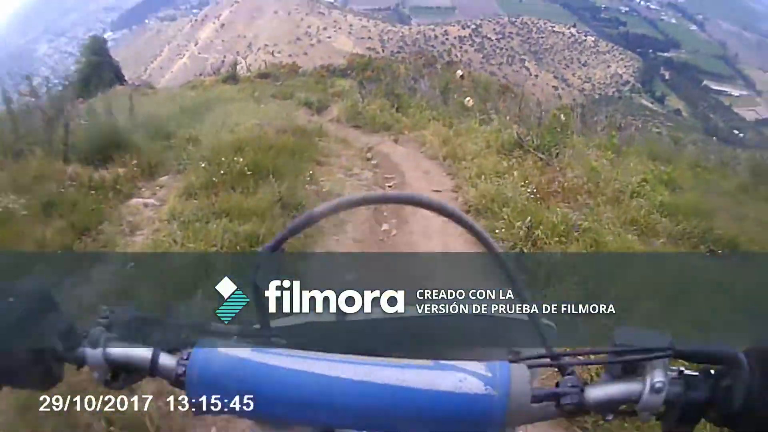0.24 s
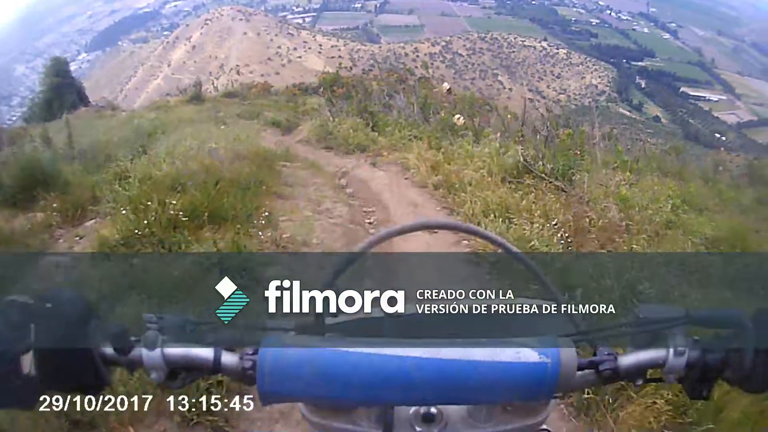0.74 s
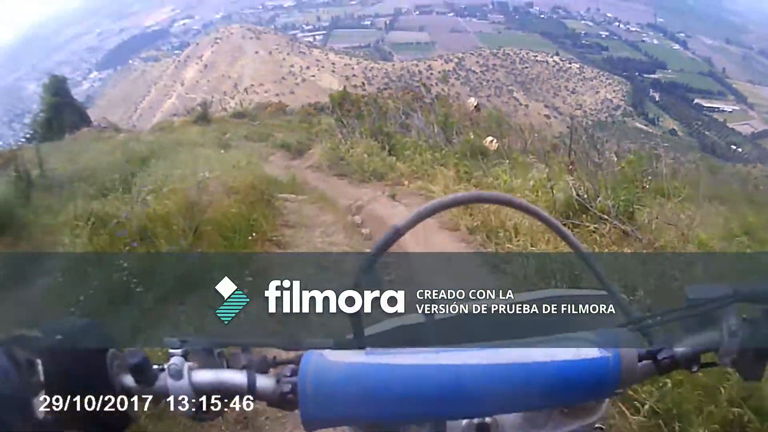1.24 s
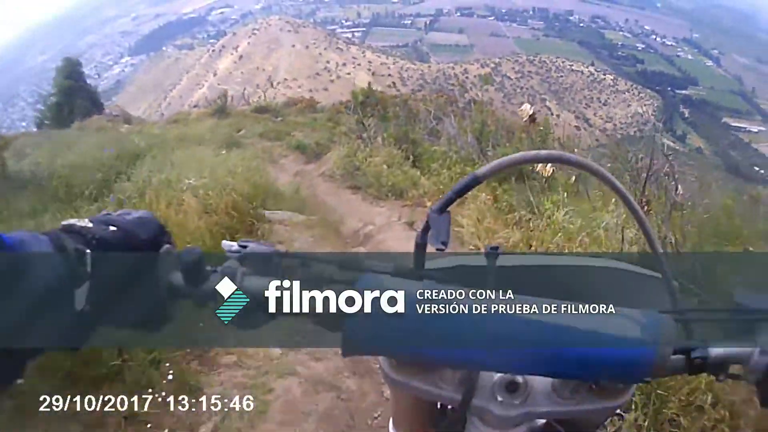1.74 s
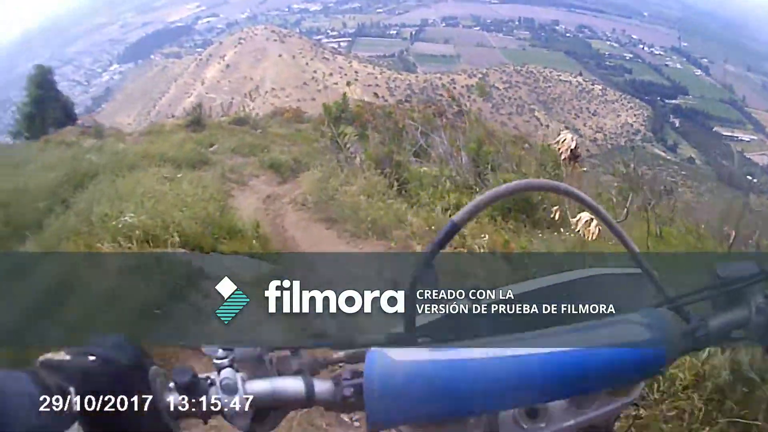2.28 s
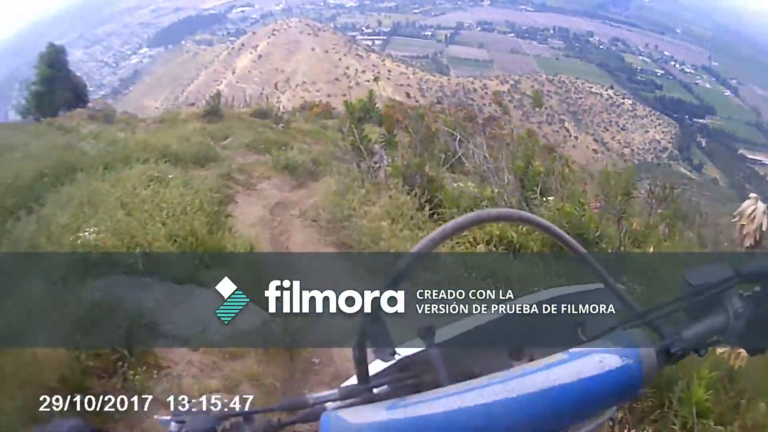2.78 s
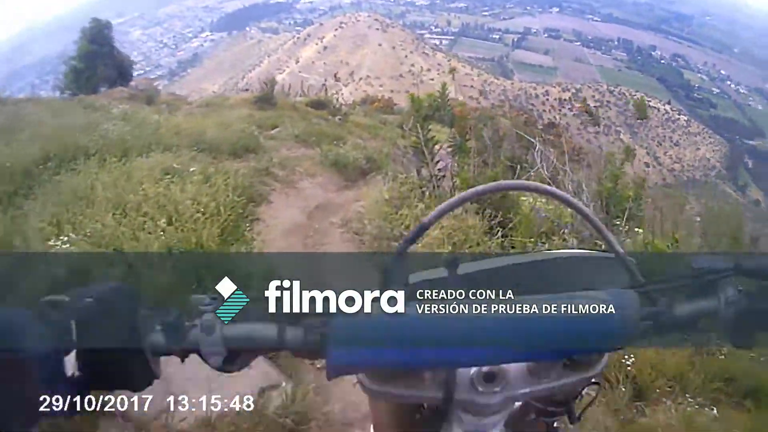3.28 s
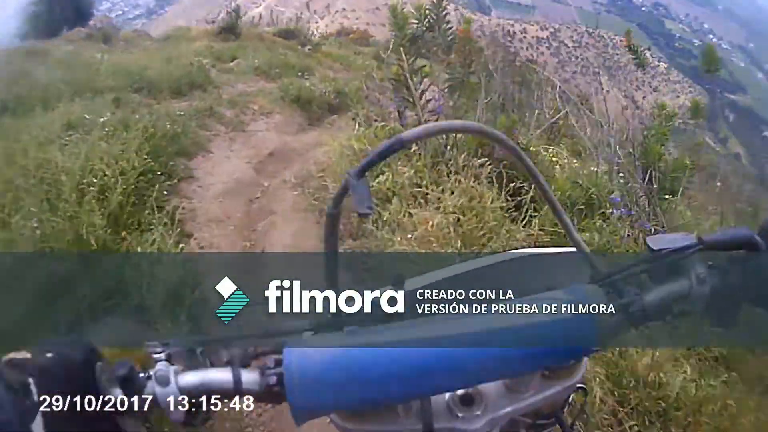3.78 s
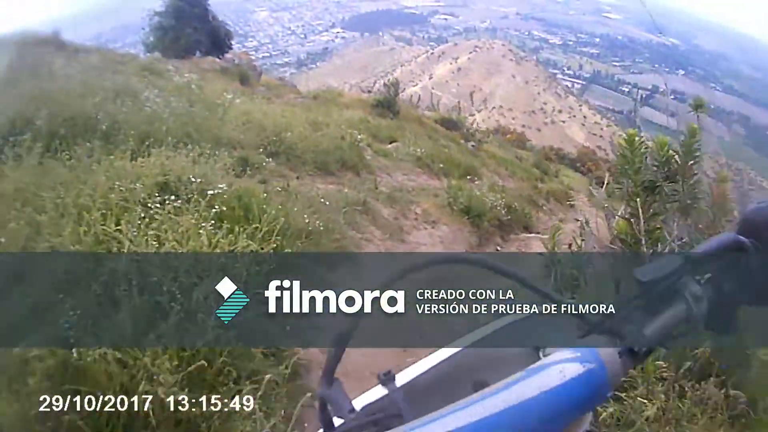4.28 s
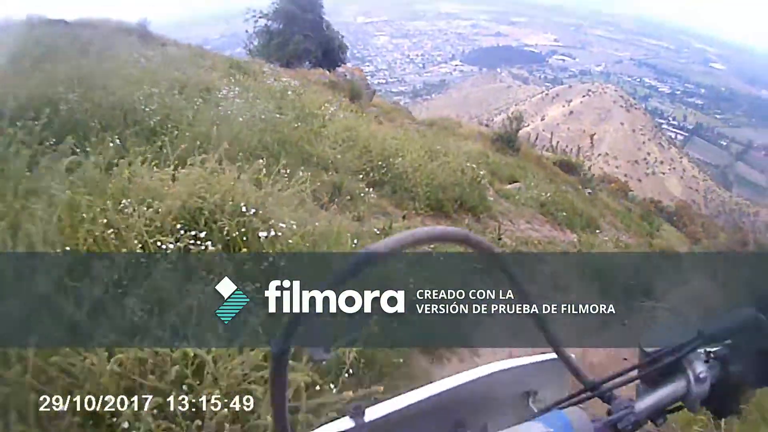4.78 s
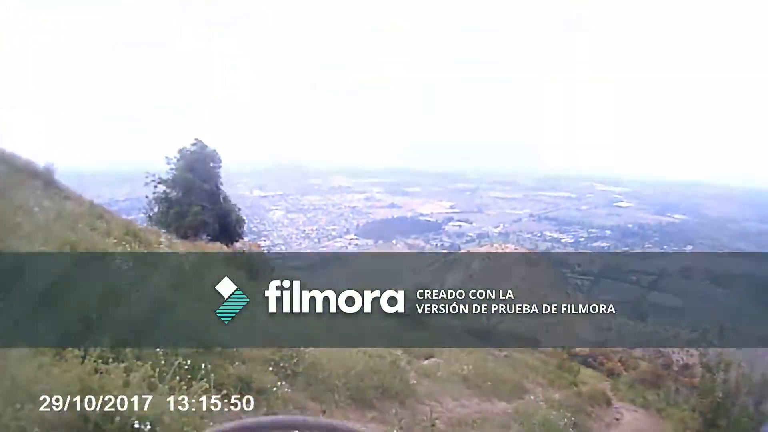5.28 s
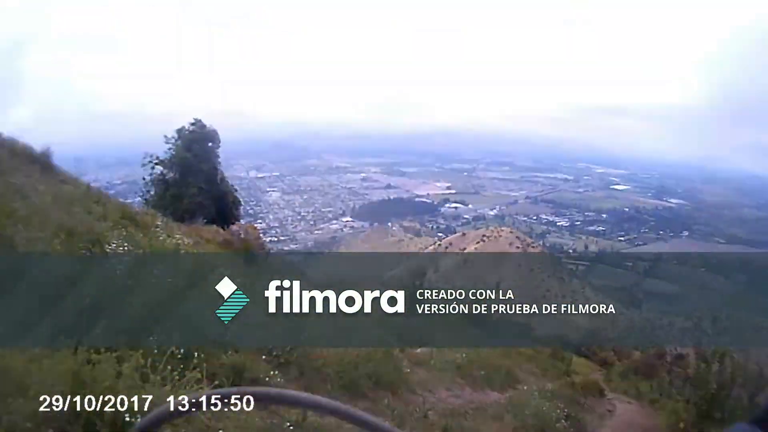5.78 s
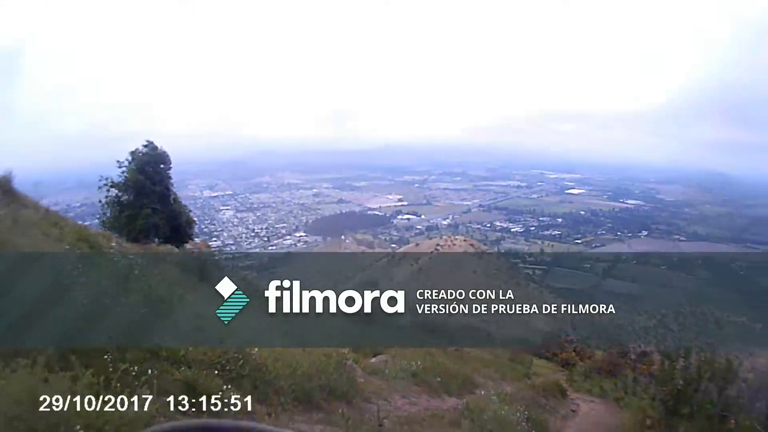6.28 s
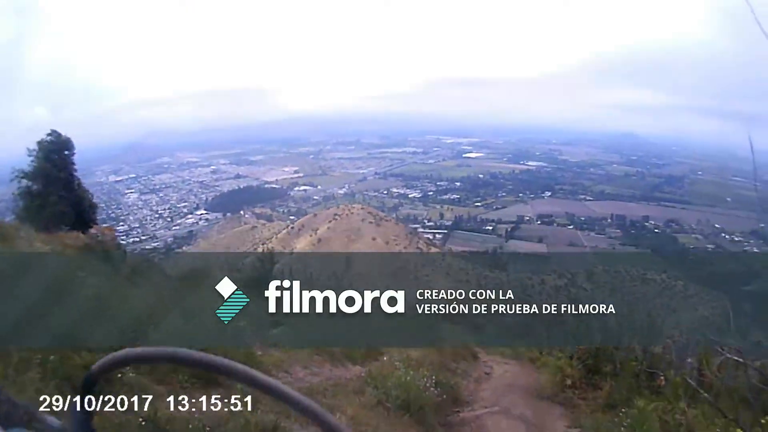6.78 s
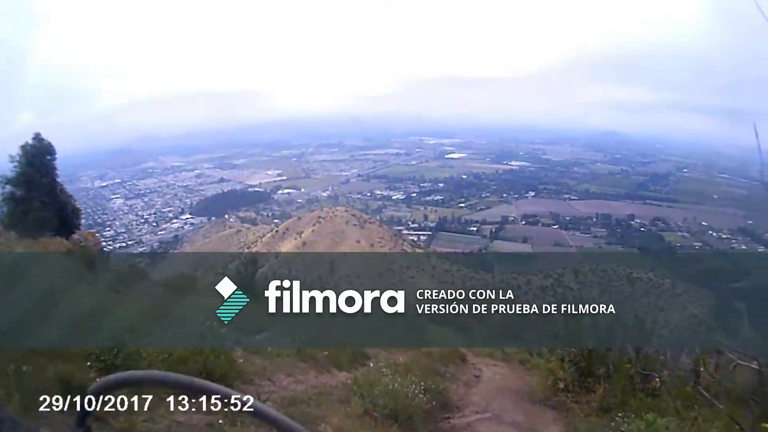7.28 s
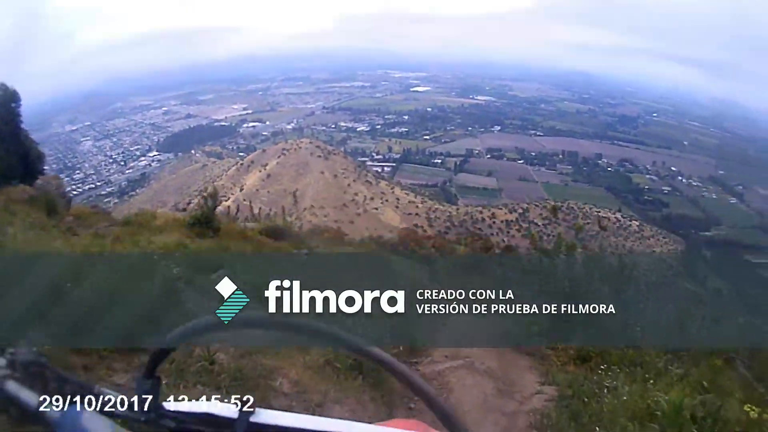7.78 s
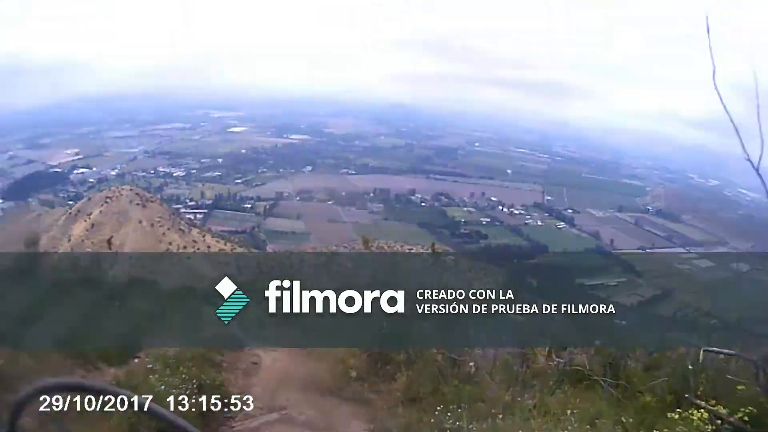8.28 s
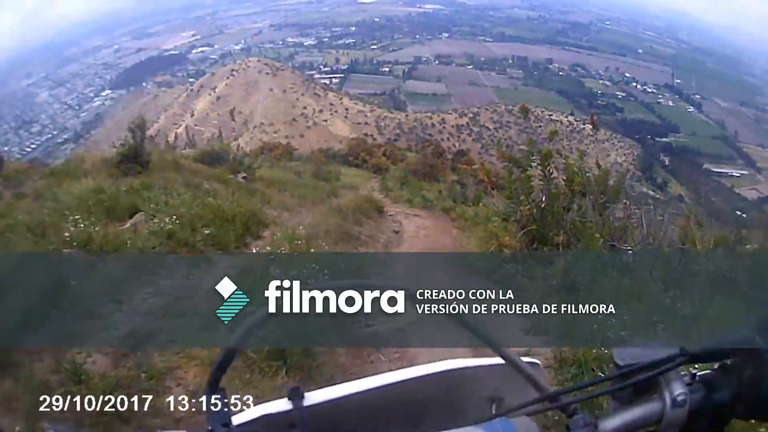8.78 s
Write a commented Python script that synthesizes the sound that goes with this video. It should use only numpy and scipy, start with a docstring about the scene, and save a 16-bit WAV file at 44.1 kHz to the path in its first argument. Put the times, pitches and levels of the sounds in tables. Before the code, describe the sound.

Throughout about nine seconds, a single-cylinder dirt bike idles down a rough outdoor trail, heard dry and close from the rider. Its soft, low exhaust putters roughly eighteen to nineteen times a second, wandering slightly and sometimes missing, while valve gear makes a grainy metallic clatter, quieter near 5 and stronger at the end. Low rumble, crunching tyres and short grass brushes vary with the ground. Light ticks at 0.6 lead to the loudest event at 0.77: a hard plastic clack with a deep thump. Smaller ticks and a lurch follow around 1.1 to 1.4, then tiny wavering brake squeaks at 1.65 to 1.8. Thumps and hollow tocks come at 2.3, another tock at 2.9. The ride calms until a heavy double-edged jolt and knock at 5.3. Later come softer swings, a faint squeak at 6.1, weak ticks near 6.5 and 8, and constant faint hiss.

```python
"""A single-cylinder dirt bike rolls down a rough trail at idle, heard by a microphone the rider wears.
From the start the exhaust putters, missing now and then, as pulses ring a pipe; filtered noise bursts
make the valve gear clatter. Noise makes the ground rumble, the tyres crunch and the grass rustle.
From the first second on, bumps thump as short low waves and knock ringing plastic parts.
Later the brake squeaks briefly, a few times, as a wavering tone. A faint hiss lies under it all."""
import sys
import numpy as np
from scipy import signal
from scipy.fft import rfft, irfft, next_fast_len
from scipy.io import wavfile

SR = 44100
rng = np.random.default_rng(int(sys.argv[2]) if len(sys.argv) > 2 else 0)


def dump(signal):
    """Clip the signal to [-1, 1] and save it as 16-bit WAV at the path in sys.argv[1]."""
    limited = np.clip(np.atleast_2d(signal).T, -1, 1)
    pcm = np.round(limited * 32767).astype(np.int16)
    wavfile.write(sys.argv[1], SR, pcm)


N = 398663
TIME = np.arange(N) / SR  # seconds


def gain_of(db):
    """Turns decibels into amplitude."""
    return 10 ** (np.asarray(db) / 20)


def evened(x):
    """Scales a signal so that its rms (its average strength) is 1."""
    return x / np.sqrt(np.mean(x ** 2) + 1e-20)


def curve(rows):
    """Joins (seconds, value) rows with straight lines."""
    return np.interp(TIME, *np.transpose(rows))


def read(points, hz):
    """Reads a (Hz, dB) curve at any frequency, with straight lines on a log-frequency axis."""
    point_hz, db = np.transpose(points)
    return np.interp(np.log(hz + 1), np.log(point_hz + 1), db)


def add(mix, s, sound):
    """Mixes a sound in from a given second on."""
    part = mix[round(s * SR):][:len(sound)]
    part += sound[:len(part)]


def coloured(x, points):
    """Shapes how strong each pitch region of x is, then scales it to rms 1."""
    size = next_fast_len(N)
    spectrum = rfft(x, size)
    gains = gain_of(read(points, np.fft.rfftfreq(size, 1 / SR)))
    return evened(irfft(spectrum * gains, size)[:N])


def ring(x, modes, order=1):
    """Passes x through resonances side by side; order 2 filters twice, for steeper skirts."""
    total = 0
    for hz, width, db in modes:
        peak = np.concatenate(signal.iirpeak(hz, hz / width, SR))
        total = total + gain_of(db) * signal.sosfilt([peak] * order, x)
    return total


def lowpass(x, hz, order=2):
    """Dulls x above hz."""
    return signal.sosfilt(signal.butter(order, min(hz, SR / 2 - 1), fs=SR, output="sos"), x)


def swell(s, half):
    """A bell-shaped rise and fall, down to 37 % at half seconds from its middle."""
    return np.exp(-np.minimum(((TIME - s) / half) ** 2, 20))


def grains(per_s, spread_db):
    """Random tiny impacts, a few of them large."""
    sizes = gain_of(spread_db * np.minimum(rng.exponential(1, N), 4))
    happens = rng.random(N) < per_s / SR
    return rng.standard_normal(N) * sizes * happens


def engine_turns():
    """Counts engine cycles as the idle speed hunts; the cylinder fires at each whole number."""
    # The idle hunts slowly about its set speed. Each row: time in seconds, firings per second.
    idle = [(0, 18.06), (1.4, 19.02), (2, 17.78), (2.2, 19.16), (3.1, 17.83), (3.9, 19.1), (4.6, 17.66),
            (5.1, 19.36), (5.4, 18.35), (5.7, 18.91), (6.7, 18.44), (7.7, 19.18), (8.2, 18.05), (9, 19.52)]
    start_share = .878  # share of a cycle already run at the start
    return start_share + np.cumsum(curve(idle)) / SR


def exhaust(turns, level_db=-54.0, silencer_db=-9.5, puff_db=-42, puff_decay=0.026, size=8192):
    """One pressure pulse a firing, trailed by a puff of rushing gas, booms through pipe and silencer."""
    # Weak or missed firings. Each row: time in seconds, level in dB against a full one.
    misfires = [(.12, -12), (1.52, -10), (2.22, -4), (2.39, -4.5), (2.59, -9.5), (3.47, -3.5), (3.85, -5),
                (5.68, -16), (6.59, -15), (8.03, -35)]
    # How the exhaust pipe favours each pitch. Each row: frequency in Hz, relative level in dB.
    pipe_curve = [(25, -38), (58, -5), (80, 7), (110, -1), (145, -10), (188, -19), (225, -6.5), (280, -4),
                  (340, -13), (400, -21), (560, -33), (1000, -62)]
    # The silencer rings once the pulse has run through the pipe: delay in seconds, Hz, decay in seconds.
    delay, hz, decay = (.013, 319, .016)
    valve_lead = .0033  # seconds by which the exhaust valve opens before the boom peaks

    firings = np.flatnonzero(np.diff(np.floor(turns)) > 0)
    force_db = rng.standard_normal(len(firings))  # firings differ by about a decibel
    for s, db in misfires:
        nearest = np.argmin(abs(firings / SR - s))
        force_db[nearest] += db
    pulses = np.zeros(N)
    pulses[np.maximum(firings - round(valve_lead * SR), 0)] = gain_of(force_db)

    # each pulse leaves a fading trail, which sets the strength of the gas noise
    trails = signal.lfilter([1], [1, -np.exp(-1 / (puff_decay * SR))], pulses)
    gas = pulses + gain_of(puff_db) * trails * rng.standard_normal(N)

    # turn the pipe's curve into a sound that rings only after the pulse (minimum phase)
    log_gain = np.log(gain_of(read(pipe_curve, abs(np.fft.fftfreq(size, 1 / SR)))))
    response = np.exp(np.conj(signal.hilbert(log_gain)))
    pipe = -np.fft.ifft(response).real[:size // 2]

    since = np.maximum(np.arange(len(pipe)) / SR - delay, 0)
    silencer = gain_of(silencer_db) * np.sin(2 * np.pi * hz * since) * np.exp(-since / decay)
    boom = pipe / abs(pipe).max() + silencer
    putter = lowpass(signal.oaconvolve(gas, boom)[:N], 2700)
    return gain_of(level_db) * evened(putter)


def clatter(turns, head_db=-1.0, cases_db=1.1, between_db=-14, uneven_db=2.5, rise=0.0009):
    """Valves and piston shake the cylinder head and the cases at fixed points of each cycle."""
    # Bursts of valve and piston noise. Each row: share of the cycle after firing,
    # decay of the power in seconds, level in dB in the head, level in dB in the cases.
    strokes = [(.26, .007, -8, -4), (.65, .008, 1, -4), (.76, .009, -11, -1), (.93, .007, -8, -6)]
    # What head and cases ring with. Each row: Hz, width in Hz of one filter pass, level in dB.
    head_modes = [(651, 134, -2.5), (913, 174, -4), (1177, 180, 2.5), (1366, 100, -4.5), (3090, 110, -10)]
    case_modes = [(472, 170, -7), (1875, 170, -0.5), (1956, 600, -6.5), (2370, 115, -17.5),
                  (3645, 190, -15.5), (3810, 170, -9.5)]
    # How loud the clatter is. Each row: time in seconds, gain in dB on head and cases together.
    loudness = [(0.0, -69.5), (1.63, -68.5), (2.19, -69), (2.54, -71), (4.86, -73), (5.76, -69),
                (9.04, -67)]

    period = TIME[-1] / (turns[-1] - turns[0])  # average seconds per cycle
    head = cases = gain_of(between_db) ** 2  # power of the noise between bursts
    for share, decay, in_head_db, in_cases_db in strokes:
        since = (turns - share) % 1 * period
        cycle = np.floor(turns - share).astype(int)
        force = gain_of(uneven_db * rng.standard_normal(size=256))[cycle]
        power = force ** 2 * np.exp(-since / decay) * (1 - np.exp(-since / rise))
        head = head + power * gain_of(in_head_db) ** 2
        cases = cases + power * gain_of(in_cases_db) ** 2
    head_noise, case_noise = rng.standard_normal((2, N))
    head_sound = evened(ring(head_noise * np.sqrt(head), head_modes, order=2))
    case_sound = evened(ring(case_noise * np.sqrt(cases), case_modes, order=2))
    metal = gain_of(head_db) * head_sound + gain_of(cases_db) * case_sound
    return gain_of(curve(loudness)) * metal


def ride():
    """How much harder than usual the ground shakes the bike, in dB; drives rumble and tyre noise."""
    # The shaking eases through the slow bend. Each row: time in seconds, strength in dB.
    shaking = [(0.0, -45), (0.98, -37.5), (2.47, -46), (2.62, -54), (3.07, -52), (5.46, -40), (5.87, -49),
               (6.19, -43), (6.67, -48.5), (7.88, -41), (9.04, -49)]
    usual_db = -45
    return curve(shaking) - usual_db


def trail(tyres_db=-67.0, brush_db=0, patchy_db=1.1, patches_hz=4):
    """Tyres crunch over patchy dirt, louder on a hard ride; grass and grit sweep past in short strokes."""
    # Colour of tyres on dirt, and of grass. Each row: frequency in Hz, relative level in dB per Hz.
    dirt = [(150, -10.5), (450, 3), (750, -1), (1000, 1.5), (1350, 4), (1580, -4), (2000, -1), (2700, -13),
            (3800, -13), (4600, -15.5), (8000, -26.5)]
    grass = [(300, -11), (900, 8.5), (1350, 7), (1600, 8), (2000, 12), (2700, -6), (3600, 2.5),
             (4600, -13.5), (6500, -21.5), (12000, -35)]
    # Grass and grit brushing the bike. Each row: middle in seconds, level in dB, half length in seconds.
    brushes = [(0.159, -60.5, 0.03), (0.684, -56, 0.015), (.745, -57.5, .018), (1.116, -57.5, 0.041),
               (1.38, -61, 0.027), (1.534, -62.5, 0.017), (1.799, -59.5, 0.029), (1.89, -59, 0.024),
               (2.343, -61.5, 0.034), (4.992, -68.5, 0.085), (5.27, -66, 0.047), (5.35, -66, 0.066),
               (6.21, -60, 0.039), (6.52, -66.5, 0.082), (7.41, -63, 0.045), (7.685, -64, 0.025),
               (7.848, -62, 0.045)]
    tyres_follow = .25  # dB gained for each dB of harder ride

    patches = patchy_db * evened(lowpass(rng.standard_normal(N), patches_hz))
    crunch = coloured(grains(per_s=4000, spread_db=0.5), dirt)
    tyres = gain_of(tyres_db + tyres_follow * ride() + patches) * crunch
    strokes = sum(gain_of(db) * swell(s, half) for s, db, half in brushes)
    rustle = coloured(grains(per_s=5000, spread_db=1), grass)
    return tyres + gain_of(brush_db) * strokes * rustle


def swing(s, db, hz, half):
    """A short to-and-fro of the microphone: a low wave that swells and fades."""
    return gain_of(db) * swell(s, half) * np.cos(2 * np.pi * hz * (TIME - s))


def jolts(rumble_db=-41):
    """The microphone rumbles with the ride, lurches in dips and thumps on bumps: the harder, the shorter."""
    # Colour of the rumble. Each row: frequency in Hz, relative level in dB per Hz.
    rumble_curve = [(5, 0), (15, 6.5), (28, 0), (45, -11.5), (80, -18.5), (130, -26), (200, -31.5),
                    (400, -48), (1000, -84)]
    # Slow swings in dips of the trail. Each row: middle in seconds, peak in dB, frequency in Hz.
    lurch_rows = [(0.755, -15, 24.5), (0.868, -26.5, 12), (1.301, -28, 17), (1.829, -29.5, 23),
                  (2.329, -26, 10.8), (5.282, -22, 26.4), (6.05, -32.5, 34), (6.261, -33.5, 33),
                  (6.479, -32.5, 23)]
    # Jolts through the suspension. Each row: middle in seconds, peak in dB, frequency in Hz.
    thump_rows = [(0.767, -14.5, 86), (.885, -21.5, 68), (2.272, -27.5, 77.6), (2.341, -32, 114),
                  (4.119, -36, 96), (4.408, -35, 104), (5.294, -13.5, 58), (5.309, -14, 83),
                  (5.483, -40, 84), (5.836, -31.5, 102), (6.26, -29, 96), (7.751, -40.5, 108)]
    rumble_follows = 0.88  # dB gained for each dB of harder ride
    lurch_cycles = 0.95  # half length of a lurch, in swings
    thump_s, thump_db = 0.007, -27  # half length in seconds of a middling thump, and its level
    halving_db = 18.5  # a thump this much harder is half as long

    rumble_gain = gain_of(rumble_db + rumble_follows * ride())
    rumble = rumble_gain * coloured(rng.standard_normal(N), rumble_curve)
    lurches = sum(swing(s, db, hz, lurch_cycles / hz) for s, db, hz in lurch_rows)
    thumps = 0
    for s, db, hz in thump_rows:
        half = thump_s * 2 ** ((thump_db - db) / halving_db)
        thumps = thumps + swing(s, db, hz, half)
    return rumble + lurches + thumps


def struck(rows, modes, top_hz, chatter, decay, size=4096):
    """A sharp contact and a moment of chatter ring a part; each contact has its own brightness."""
    out = np.zeros(N)
    t = np.arange(size) / SR
    noises = rng.standard_normal((len(rows), size))
    for (s, db, bright_hz), noise in zip(rows, noises):
        contact = (t == 0) + chatter * noise * np.exp(-t / decay)
        blow = lowpass(ring(contact, modes), bright_hz)
        blow = lowpass(blow, top_hz, order=6)
        add(out, s, gain_of(db) * blow / abs(blow).max())
    return out


def knocks():
    """Bumps knock three plastic parts about, each ringing with its own resonances."""
    # Blows: light ticks of a loose part, a hard clack on the biggest bump, hollow tocks of the bodywork.
    # Each row: start in seconds, peak in dB, brightness (where the treble starts to fall) in Hz.
    tick_rows = [(.6297, -30.5, 6460), (.6355, -35, 5200), (.6378, -41, 4400), (.6413, -35, 4000),
                 (.6665, -51, 2000), (1.146, -43, 8000), (1.373, -49, 4970), (2.293, -34, 3700),
                 (5.3024, -33, 3920), (5.3107, -25.5, 6050), (5.3135, -49, 4500), (5.3304, -38, 3200),
                 (6.474, -46, 2400), (7.972, -45, 2200)]
    clack_rows = [(.7672, -19, 1520), (.7694, -10.5, 2050), (.7705, -20, 5000)]
    tock_rows = [(2.336, -37.5, 2000), (2.339, -39, 446), (2.8807, -29, 1700), (2.8835, -33.5, 2200),
                 (5.290, -26.5, 477), (5.2924, -28.5, 2800)]
    # What ticks, clack and tocks ring with. Each row: frequency in Hz, width in Hz, level in dB.
    clasp = [(1100, 160, 0.5), (1920, 400, 8), (2400, 150, -9), (3640, 220, -1.5), (5000, 300, -14.5)]
    shell = [(250, 140, -10), (560, 160, -11), (1000, 160, -12), (1280, 190, -2), (1850, 190, 0),
             (2170, 240, -6), (2680, 180, -9), (3065, 75, 3), (3500, 200, -14), (3950, 120, -8),
             (6000, 300, -18), (8300, 1200, -26), (13000, 4000, -26)]
    panel = [(230, 78, 1.5), (412, 39, -5.5), (508, 52, -4), (826, 59, -3), (1240, 200, -6.5),
             (1600, 120, 1), (1730, 85, -18)]

    ticks = struck(tick_rows, clasp, top_hz=6850, chatter=0.057, decay=0.002)
    clack = struck(clack_rows, shell, top_hz=17000, chatter=.04, decay=.002)
    tocks = struck(tock_rows, panel, top_hz=2000, chatter=0.049, decay=0.0022)
    return ticks + clack + tocks


def brake(squeak_hz=1367, waver_hz=25):
    """The pad briefly sings on the disc: a pure tone whose pitch wavers."""
    # Short squeaks. Each row: middle in seconds, level in dB, half length in seconds.
    squeaks = [(1.658, -55, 0.011), (1.751, -57, 0.0088), (1.804, -50, 0.0092), (6.076, -59, 0.028)]
    hz = squeak_hz + waver_hz * evened(lowpass(rng.standard_normal(N), 59))
    loudness = sum(gain_of(db) * swell(s, half) for s, db, half in squeaks)
    return loudness * np.sin(2 * np.pi * np.cumsum(hz) / SR)


def scene():
    """Adds up engine, trail, bumps and brake, with no echo."""
    turns = engine_turns()
    engine = exhaust(turns) + clatter(turns)
    return (engine + trail() + jolts() + knocks() + brake())[None]


def record(dry, hiss_db=-79, edge_hz=15700):
    """The microphone adds its hiss; then a steep filter removes what lies above edge_hz."""
    # Colour of the hiss. Each row: frequency in Hz, relative level in dB per Hz.
    hiss = [(100, -25), (3000, 4), (6000, 6.5), (9000, 4.5), (13000, 0.5), (15500, -8)]
    sound = dry + gain_of(hiss_db) * coloured(rng.standard_normal(N), hiss)
    band_limit = signal.firwin(511, edge_hz, window=("kaiser", 9), fs=SR)
    return signal.oaconvolve(sound, band_limit[None], "same")


dry = scene()
out = record(dry)
dump(out)
```